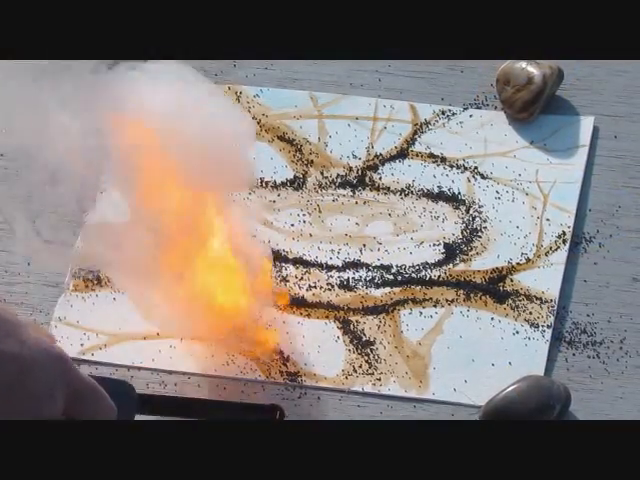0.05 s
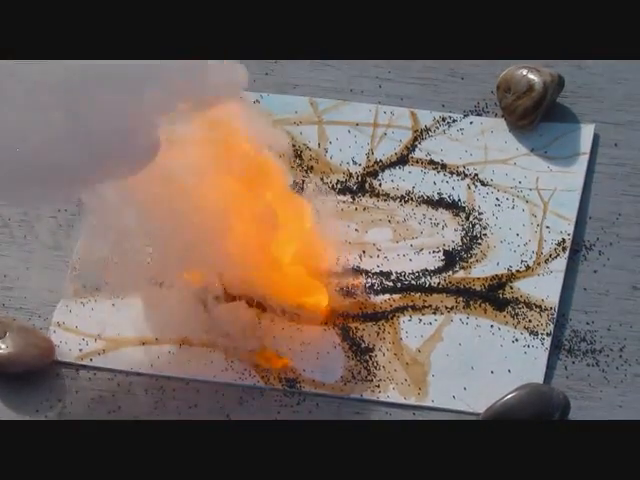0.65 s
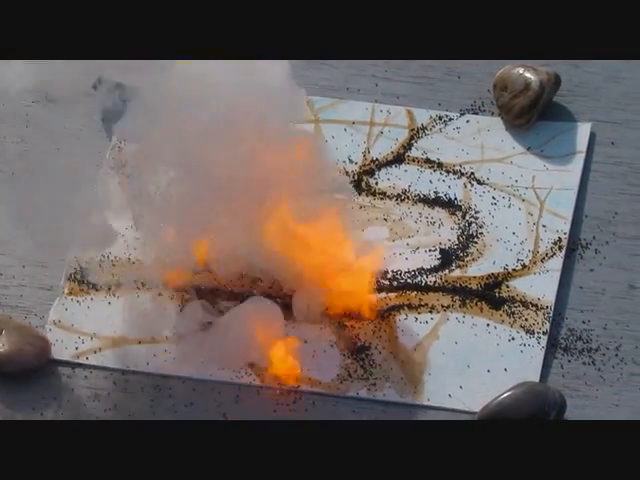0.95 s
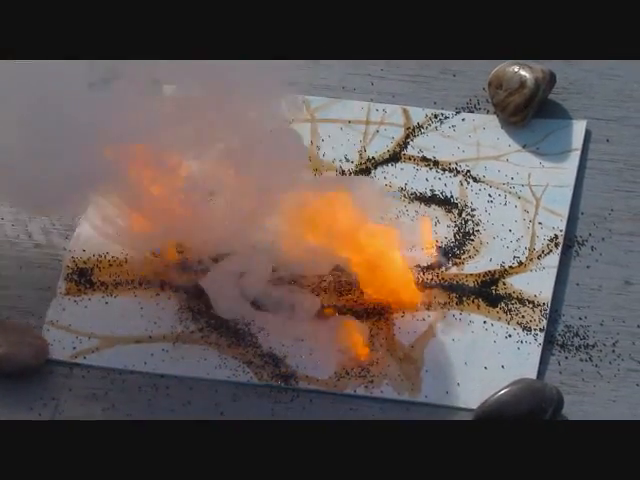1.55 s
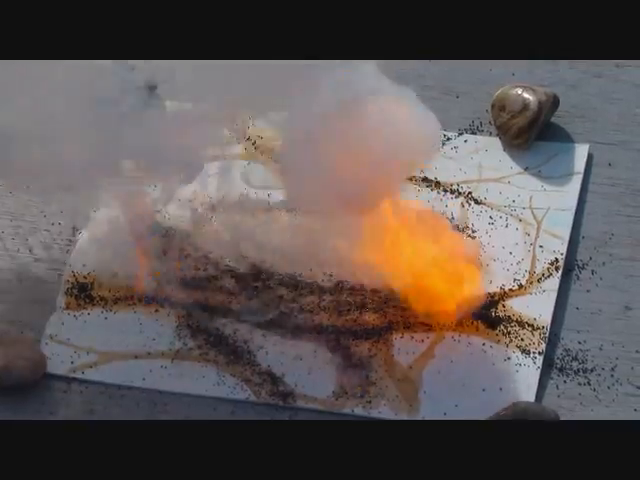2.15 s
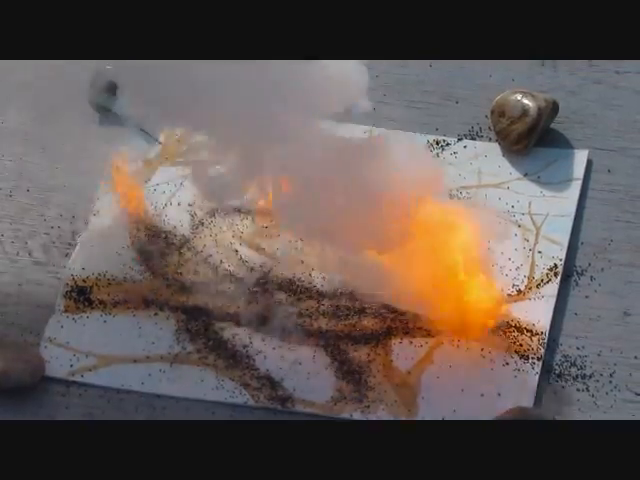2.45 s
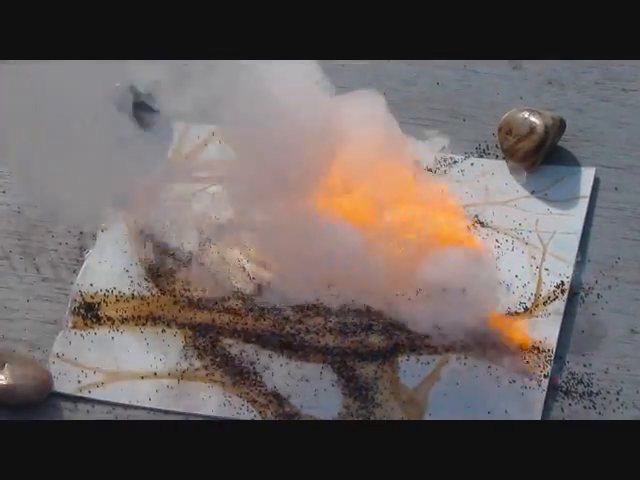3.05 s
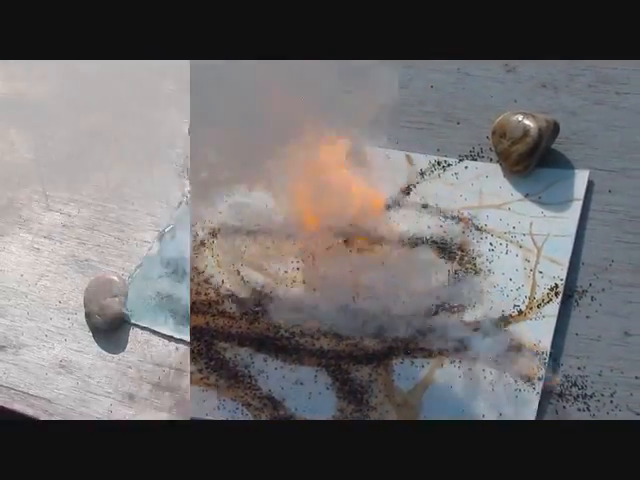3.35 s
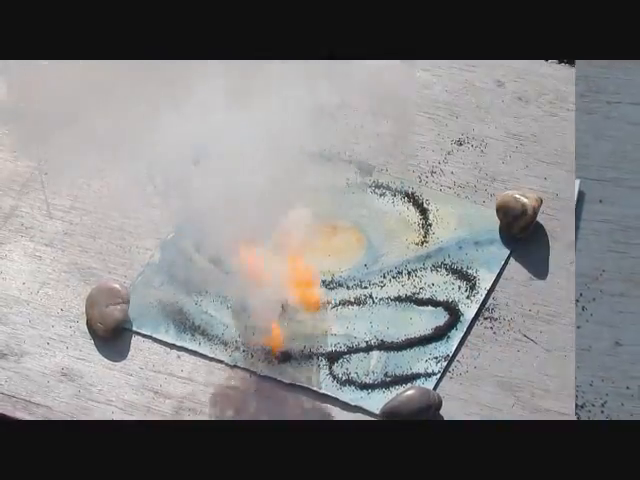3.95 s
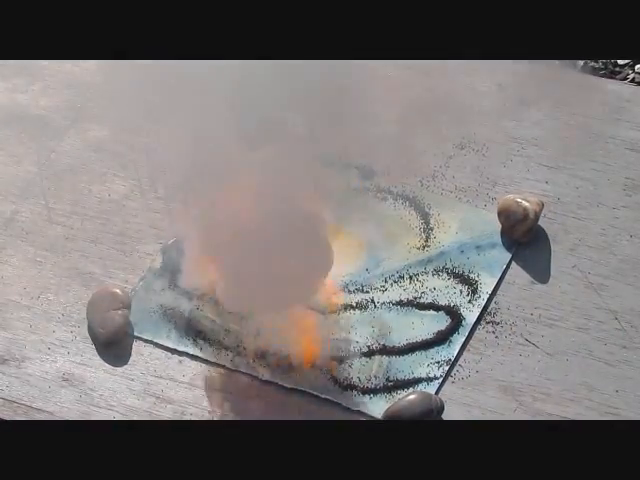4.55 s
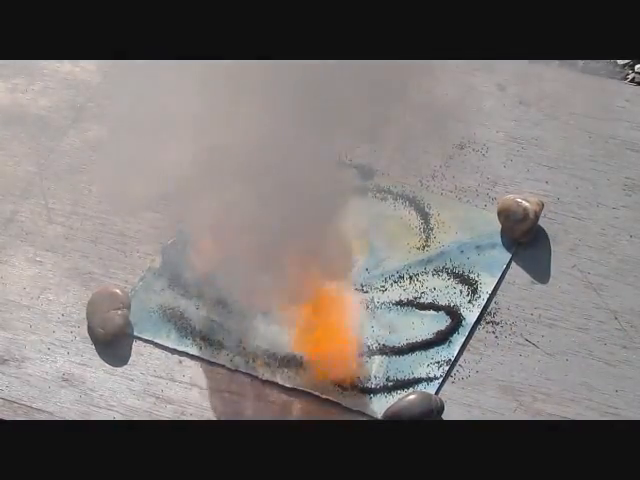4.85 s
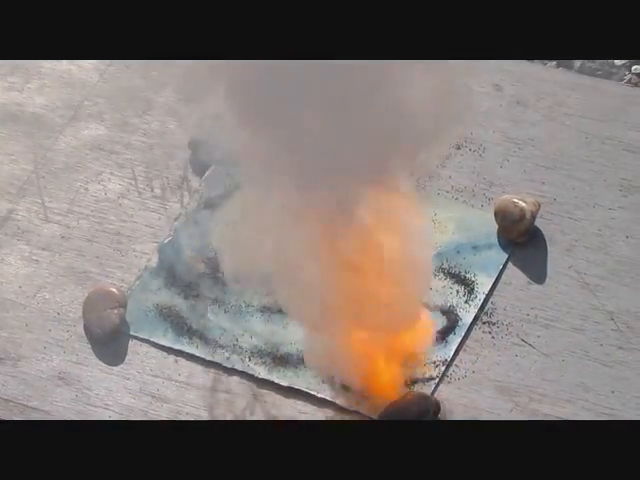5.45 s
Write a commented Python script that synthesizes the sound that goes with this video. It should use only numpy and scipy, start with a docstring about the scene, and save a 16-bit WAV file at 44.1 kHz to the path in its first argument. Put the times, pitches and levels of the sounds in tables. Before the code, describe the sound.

Loose gunpowder burns on paper outdoors with a bright fizzing hiss, a few puffs and two dull pops over low wind rumble.

```python
"""Outdoors, a stereo microphone at a table where trails of loose gunpowder burn on paper; far off, a
motor hums throughout. The first sheet burns: countless grains flash into a bright fizz over the softer
rush of the flame, and gusts rumble on the microphone. About a second in a heap goes up with a puff;
near three seconds comes a dull pop. By four seconds a second sheet has taken over and the wind eases.
That burn gives one small puff, then another dull pop just before the end."""
import sys
import numpy as np
from scipy import signal
from scipy.fft import rfft, irfft, next_fast_len
from scipy.io import wavfile
from scipy.ndimage import uniform_filter1d

SR = 44100
rng = np.random.default_rng(int(sys.argv[2]) if len(sys.argv) > 2 else 0)


def unload_wav(signal):
    """Save mono or channel-first audio to the path in sys.argv[1] as 16-bit WAV at rate SR, clipped to [-1, 1]."""
    wavfile.write(
        sys.argv[1],
        SR,
        np.round(np.clip(np.atleast_2d(signal).T, -1, 1) * 32767).astype(np.int16),
    )


N = 251811
TIME = np.arange(N) / SR
BINS_HZ = np.maximum(np.fft.rfftfreq(next_fast_len(N), 1 / SR), 1)

# the second burn takes over from the first: t/s, share of power
SECOND_SHARE = [(3.25, 0), (4.0, 0.92)]
# how fiercely the front burns along the trails: t/s, level/dB
FRONT_LEVEL = [(-0.0, -35.7), (0.05, -41.5), (0.21, -36.5), (0.62, -30.5), (1.22, -30.5), (1.34, -33),
               (1.81, -30.5), (2.61, -33), (2.98, -38.5), (3.08, -33.8), (3.29, -37.5), (3.92, -40.2),
               (4.04, -35), (4.51, -33.5), (5.42, -34.5), (5.71, -38)]
# the front flares on thick powder and falters on thin: t/s, change/dB, length/s
POWDER_SURGES = [(0.348,5,0.073), (0.792,-3.5,0.078), (0.897,2,0.031), (1.183,2,0.11), (1.94,-3.5,0.057),
                 (2.046,1,0.1), (2.14,-3.0,0.085), (2.413,-2.5,0.087), (3.19,2.1,0.072), (4.285,2.5,0.12),
                 (4.53,2,0.074), (4.885,-1.5,0.091), (5.12,-3.7,0.077), (5.273,-3,0.065), (5.478,3,0.12)]
# the lower hiss against the top of the fizz: t/s, level/dB
HISS_OFFSET = [(0, -2.5), (0.6, -7), (1.8, -6), (2.7, -3), (3.3, -5), (3.9, -6.5), (4.6, -9.5),
               (5.71, -8.5)]
# size of the flame, heard as its rush: t/s, level/dB
FLAME_LEVEL = [(0.0, -43.5), (1.21, -43), (2.23, -44), (3.3, -45.6), (3.44, -49.5), (3.9, -49.4),
               (4.21, -43.7), (5.59, -42), (5.71, -43.5)]
# colour of each burn's fizz and rush: f/Hz, relative level/dB
FIZZ_COLOUR_1 = [(2760, -37), (4700, -14), (5250, -10), (6320, -6), (7680, -7), (9010, -1), (10700, 1),
                 (11500, -1.5), (12900, -10.5), (14500, -11.5), (15600, -21)]
FIZZ_COLOUR_2 = [(2530, -30), (4300, -8.5), (4660, -7.5), (5570, -10), (8160, 1.5), (11300, 3),
                 (13200, -3.5), (15600, -13.5)]
RUSH_COLOUR_1 = [(110, -19), (180, -6.5), (289, -4.5), (401, -13), (484, -5.5), (768, -3.5), (904, -3),
                 (1530, -0.5), (2790, -3), (4420, -7), (4600, -15.5), (5980, -64), (10100, -120)]
RUSH_COLOUR_2 = [(110, -36), (180, 0), (282, 0.5), (369, -12.5), (478, -5), (880, -2.5), (1010, 0),
                 (1470, 0), (2400, 1), (3800, -5), (4600, -3.5), (5980, -8.5), (10100, -120)]
# how alike each burn is in the two channels: f/Hz, likeness (capped at 0.99 in use)
LIKENESS_1 = [(200, 1.1), (1000, 0.67), (2900, 0.85), (4400, 0.3), (5300, 0.9), (6300, .93), (7100, 0.5),
              (9500, 1.5), (11200, .88), (12600, 0.9), (14400, 0.7), (15500, .35)]
LIKENESS_2 = [(200, 0.89), (800, 0.86), (1500, 0.62), (4300, 0.72), (5900, 0.41), (6500, 0.75),
              (10000, 0.8), (13000, 0.6), (15500, 0.65)]
# where each burn lies before the microphone: f/Hz, left over right/dB
BALANCE_1 = [(60, -5.5), (140, -2), (500, -1.0), (2600, -2), (4000, 0.5), (5800, -0.5), (7100, 7),
             (8200, -3), (9400, -10.5), (11600, -4), (12600, -10), (14000, -1.5), (15500, -3)]
BALANCE_2 = [(60, -3), (130, -1.0), (640, -0.8), (2400, -3.8), (3800, 0), (4700, -2.5), (5900, 4),
             (7500, -1), (11500, -2), (15000, 0.5)]
# lead of the left microphone on each fizz: f/Hz, phase/rad
LEFT_LEAD_1 = [(3500, -0.2), (4300, -1.6), (4700, 1), (5300, -0.15), (6700, 0.1), (7600, -1.66),
               (9100, -1.2), (10400, -0.47), (12300, -0.54), (13000, 0.4), (15000, -0.4)]
LEFT_LEAD_2 = [(200, 0), (1400, -0.4), (3000, 0.3), (4300, -0.052), (5500, 0.88), (6300, -0.014),
               (8000, -0.25), (10000, 0.43), (15000, 0.2)]
# bands of the first burn that the table's reflection cuts or lifts: f/Hz, width/Hz, gain/dB, from/s, to/s
TABLE_GLANCES = [(780, 130, -4.5, -0.3, 2.7), (1580, 140, 2, -0.3, 3.3), (2680, 1300, 3, 0.48, 2.16),
                 (3500, 420, -6.5, -0.3, 1.63), (4430, 340, -6.5, -0.3, 3.7), (11100, 900, 1, 1.5, 3.4)]
# heaps that flare at once: t/s, level/dB, half length/s, top f/Hz
HEAP_PUFFS = [(0.468, -45, 0.029, 4500), (0.898, -34, 0.023, 14000), (0.956, -31, .01, 380),
              (1.262, -44, .03, 3500), (4.86, -46.5, .03, 3000)]
# colour of a puff: f/Hz, relative level/dB
PUFF_COLOUR = [(130, -8), (200, 0), (380, 0.5), (600, -3.5), (1800, 1), (4000, -5), (8000, -6.5),
               (15000, -29)]
# dull pops: t/s, level/dB, f/Hz, t60/s, level of the low ring before its doubling/dB
DULL_POPS = [(2.7885, -27.3, 870, .05, -41.5), (5.4935, -24, 990, .018, -62)]
# the hollow note of a pop: multiple of its pitch, relative level/dB
POP_MODES = [(.62, -9), (.78, -7), (1, 0), (1.9, -11)]
# gusts on the microphone: t/s, length/s, level/dB
MIC_GUSTS = [(0.665, .035, -43.5), (0.776, 0.023, -41.5), (1.1, .22, -46), (1.344, 0.033, -38.5),
             (1.41, .17, -45), (1.581, 0.053, -41), (2.055, 0.088, -45), (2.213, 0.2, -45),
             (2.504, 0.031, -43), (2.666, .25, -46.5), (3.003, 0.223, -45), (3.294, .045, -44.5),
             (3.364, 0.044, -45), (3.441, 0.037, -40.5), (3.633, 0.033, -47), (4.08, .12, -50)]
# colour of the wind on the microphone and of the outdoor background: f/Hz, relative level/dB
GUST_COLOUR = [(12, -6), (25, -12.5), (45, 2), (80, -2), (120, -10), (180, -22), (350, -38), (700, -55)]
RUMBLE_COLOUR = [(20, -22), (45, 2), (70, 0.5), (130, 1), (220, -5), (400, -21.5), (800, -28)]
# tones of the far motor: f/Hz, level/dB
MOTOR_TONES = [(55.3, -53.5), (110.6, -57)]


def fizz(colour, likeness, balance, lead, grain_db, flicker_db, sputter_db, split_hz=7600):
    """Grains flash in jets of gas: a fiercer front lights more, and the top flares more than the hiss."""
    front_db, surge = in_time(FRONT_LEVEL), surge_db()
    top_db = front_db + surge
    hiss_db = front_db + in_time(HISS_OFFSET) + 0.82 * surge
    flashes = grains(per_s=9000 * from_db(top_db - top_db.max()), size_db=2.0)
    jets = turbulence() + from_db(grain_db) * flashes
    sound = spread(jets, colour, at_hz(likeness), at_hz(balance), at_hz(lead))
    low = shaped(sound, lowpass(split_hz, slope=16))
    top = rms_one(sound - low) * from_db(top_db)
    hiss = rms_one(low) * from_db(hiss_db + sputter_db * drift(9.5))
    return (top + hiss) * from_db(flicker_db * drift(18))


def grains(per_s, size_db):
    """Grains flash at random moments, most of them tiny, a few large."""
    sizes = from_db(size_db * np.minimum(rng.exponential(1, N), 6))
    return rms_one(turbulence() * sizes * (rng.random(N) < per_s / SR))


def surge_db():
    """Each thick or thin patch of powder is a smooth swell or dip in the burn."""
    return sum(db * np.exp(-(2 * (TIME - s) / length) ** 2) for s, db, length in POWDER_SURGES)


def flame_rush(colour, likeness, balance, grain_db, flicker_db):
    """The flame's softer, lower rush, with a little sputter in it."""
    rush_db = in_time(FLAME_LEVEL) + 0.17 * surge_db()
    gas = turbulence() + from_db(grain_db) * grains(per_s=1500, size_db=2.5)
    level = from_db(rush_db + flicker_db * drift(17))
    return level * spread(gas, colour, at_hz(likeness), at_hz(balance))


def shifting_jets(x, patchy_db=0.9, rate_hz=11, count=12):
    """Small jets open and close, so that bands of the hiss swell and fade on their own."""
    centres_hz = np.geomspace(1000, 15000, count)
    bands = [np.interp(BINS_HZ, centres_hz, corner) for corner in np.eye(count)]
    return sum(shaped(x, band) * from_db(patchy_db * drift(rate_hz)) for band in bands)


def table_glance(x, fade_s=0.38):
    """Sound glancing off the table cuts some pitches and lifts others, until the front has moved on."""
    for hz, width_hz, db, from_s, until_s in TABLE_GLANCES:
        band = shaped(x, np.exp(-(2 * (BINS_HZ - hz) / width_hz) ** 2))
        present = np.clip(.5 + np.minimum(TIME - from_s, until_s - TIME) / fade_s, 0, 1)
        x = x + (from_db(db) - 1) * band * present
    return x


def close_reflection(x, ripple_hz=592, strength=0.13, dull_hz=6000):
    """One close, dull reflection reaches the microphone late and ripples the spectrum at even steps."""
    delay = np.exp(-2j * np.pi * BINS_HZ / ripple_hz)
    return shaped(x, 1 + strength * delay * lowpass(dull_hz))


def puffs():
    """Each heap of powder goes up in one short gush, broad or dull, in the centre of the image."""
    gush = spread(turbulence(), PUFF_COLOUR, alike=1.0, balance_db=0.0)
    out = 0
    for s, db, half_length, top_hz in HEAP_PUFFS:
        swell = np.exp(-((TIME - s) / half_length) ** 4)
        out += from_db(db) * swell * shaped(gush, lowpass(top_hz))
    return out


def pops(rise_s=0.0023, ring_hz=410, ring_t60=0.18, ring_rise_s=0.019, sag_per_s=4.6):
    """Each pop is a short, rough, hollow note, followed by a lower ring that sags in pitch."""
    out = np.zeros(N)
    for s, db, hz, t60, ring_db in DULL_POPS:
        age = np.maximum(TIME - s, 0)
        phase = 2 * np.pi * hz * age
        note = sum(from_db(mode_db) * np.sin(multiple * (phase + .35 * drift(150)))
                   for multiple, mode_db in POP_MODES)
        out += note * from_db(db - 60 * age / t60) * (1 - np.exp(-(age / rise_s) ** 2))
        ring = 2 * np.sin(2 * np.pi * ring_hz * (1 - np.exp(-sag_per_s * age)) / sag_per_s)
        out += ring * from_db(ring_db - 60 * age / ring_t60) * (1 - np.exp(-age / ring_rise_s))
    return np.sqrt(2) * out * pan(-1.6)


def wind(breeze_gain, breeze_db=-54.5, rise_s=0.0086, fall_s=0.025, lumpy_db=1.0, even_s=0.047):
    """Eddies buffet the microphone, the right side more; gusts rise, hold and fall over a light breeze."""
    strength = from_db(breeze_db) * breeze_gain
    for s, length, db in MIC_GUSTS:
        envelope = np.clip(.5 + np.minimum((TIME - s) / rise_s, (s + length - TIME) / fall_s), 0, 1)
        strength = np.maximum(strength, from_db(db) * envelope)
    eddies = spread(turbulence(), GUST_COLOUR, alike=0.33, balance_db=-11.0)
    power = uniform_filter1d(eddies.mean(axis=0) ** 2, int(even_s * SR))
    eddies /= np.sqrt(power + 1e-9)  # evened out, so the gusts set the level
    return strength * from_db(lumpy_db * drift(30)) * eddies


def outdoor_rumble(early, late):
    """The low sound of the place: wide under the first burn, louder and central under the second."""
    wide = from_db(-58.5) * spread(turbulence(), RUMBLE_COLOUR, alike=0.33, balance_db=0.5)
    central = from_db(-50.0) * spread(turbulence(), RUMBLE_COLOUR, alike=0.97, balance_db=-0.5)
    return early * wide + late * central


def motor():
    """A motor far off, a little to the right: two slightly wavering low tones."""
    out = np.zeros(N)
    for hz, db in MOTOR_TONES:
        out += from_db(db + .7 * drift(3)) * np.sin(2 * np.pi * hz * TIME + .25 * drift(3))
    return np.sqrt(2) * out * pan(-2.3)


def spread(pair, colour, alike, balance_db, lead=0):
    """Colour two unrelated signals and mix them to left and right; their middle has rms 1."""
    alike = np.clip(alike, -.99, .99)
    sign = np.array([[1], [-1]])
    ports = pan(balance_db) * np.exp(.5j * lead * sign)
    middle = np.sqrt(np.sum(np.abs(ports) ** 2, axis=0) + 2 * alike * np.cos(lead))
    gain = from_db(at_hz(colour)) * ports / middle
    common = shaped(pair[0], gain * np.sqrt(1 + alike))
    opposed = shaped(pair[1], gain * np.sqrt(1 - alike) * sign)
    return rms_one(common + opposed)


def turbulence():
    """Two unrelated white noises."""
    return rng.standard_normal((2, N))


def drift(rate_hz, hop=40, settle=2000):
    """A smooth random wander with rms 1."""
    pole = np.exp(-2 * np.pi * rate_hz * hop / SR)
    noise = rng.standard_normal(N // hop + settle + 2)
    slow = signal.lfilter([1], [1, -2 * pole, pole * pole], noise)[settle:]
    return np.interp(np.arange(N) / hop, np.arange(len(slow)), rms_one(slow))


def shaped(x, gain):
    """Filter with a gain per frequency."""
    size = next_fast_len(N)
    return irfft(rfft(x, size) * gain, size)[..., :N]


def lowpass(hz, slope=4):
    """Gain per frequency that has fallen to a half at hz."""
    return 1 / (1 + (BINS_HZ / hz) ** slope)


def in_time(points):
    """A table joined by straight lines, one value per sample."""
    return np.interp(TIME, *np.transpose(points))


def at_hz(points):
    """A table joined by straight lines in log frequency."""
    hz, value = np.transpose(points)
    return np.interp(np.log(BINS_HZ), np.log(hz), value)


def pan(db):
    """Channel gains that put the left db above the right."""
    return from_db(np.array([[.5], [-.5]]) * db)


def from_db(db):
    """Decibels to gain."""
    return 10 ** (np.asarray(db) / 20)


def rms_one(x):
    """Scale so that the middle of the channels has rms 1."""
    return x / np.sqrt(np.mean(np.atleast_2d(x).mean(axis=0) ** 2) + 1e-20)


def scene():
    """The two burns in turn on the table, wind on the microphone, rumble and motor beyond."""
    share = in_time(SECOND_SHARE)
    early, late = np.sqrt(1 - share), np.sqrt(share)
    first = from_db(-0.63) * fizz(FIZZ_COLOUR_1, LIKENESS_1, BALANCE_1, LEFT_LEAD_1,
                                  grain_db=-12.0, flicker_db=0.46, sputter_db=0.5)
    first += flame_rush(RUSH_COLOUR_1, LIKENESS_1, BALANCE_1, grain_db=-12.5, flicker_db=0.53)
    second = from_db(-0.27) * fizz(FIZZ_COLOUR_2, LIKENESS_2, BALANCE_2, LEFT_LEAD_2,
                                   grain_db=-10.5, flicker_db=0.6, sputter_db=1.2)
    second += from_db(0.97) * flame_rush(RUSH_COLOUR_2, LIKENESS_2, BALANCE_2,
                                         grain_db=-15.5, flicker_db=0.36)
    fire = shifting_jets(early * table_glance(first) + late * close_reflection(second))
    rumble = outdoor_rumble(early, late)
    return fire + puffs() + pops() + wind(early) + rumble + motor()


def record(dry):
    """The top is cut steeply above 15750 Hz."""
    return signal.sosfiltfilt(signal.ellip(10, .05, 70, 15750, fs=SR, output="sos"), dry)


dry = scene()
out = record(dry)
unload_wav(out)
```